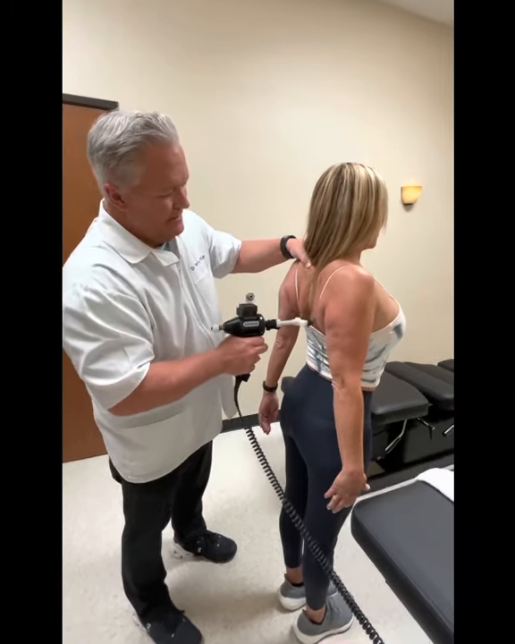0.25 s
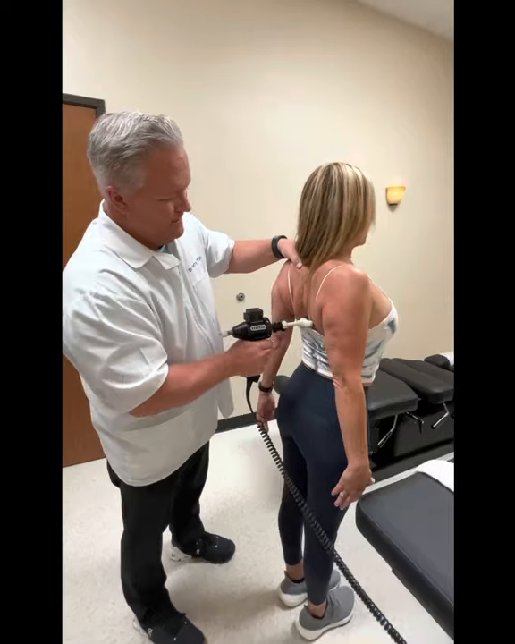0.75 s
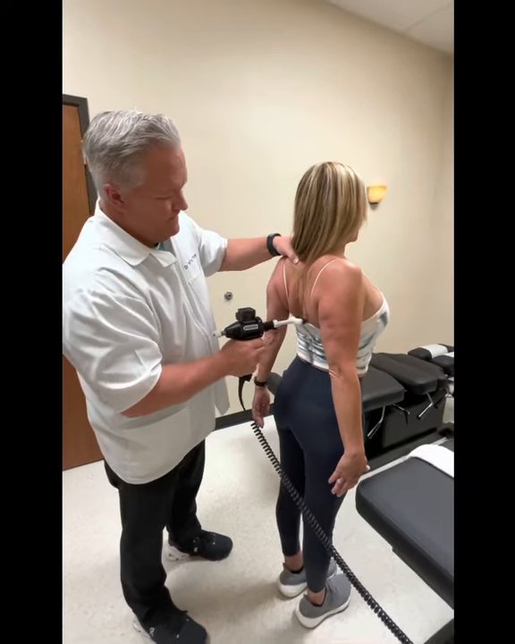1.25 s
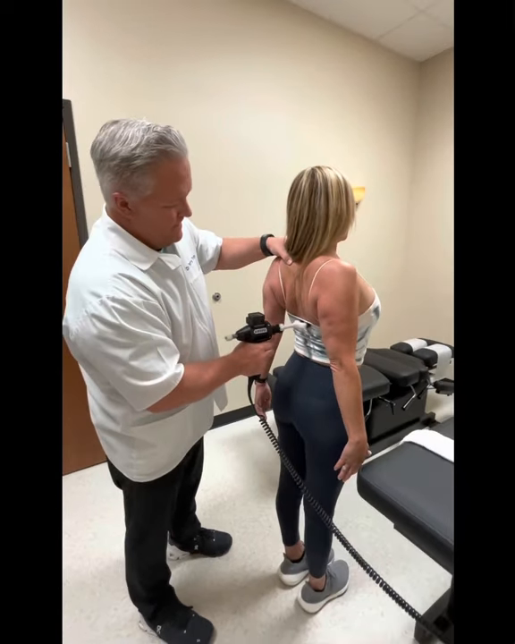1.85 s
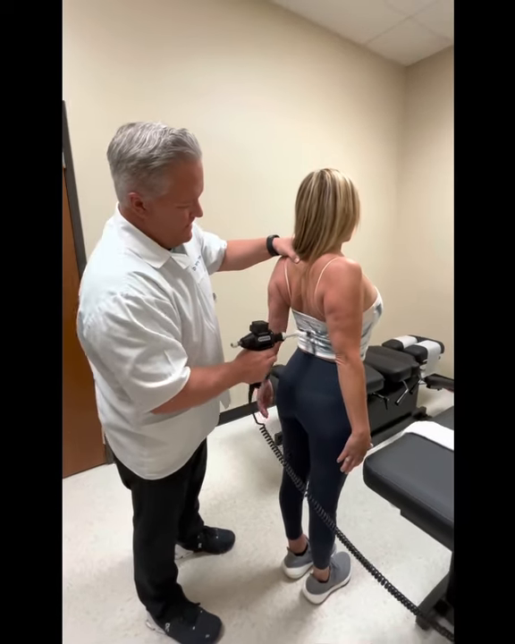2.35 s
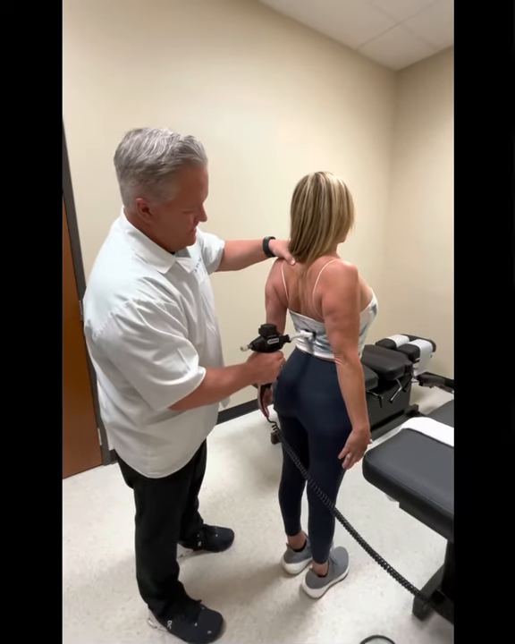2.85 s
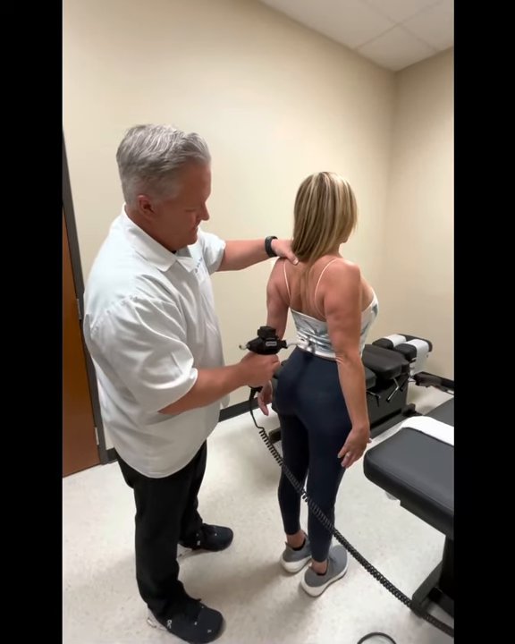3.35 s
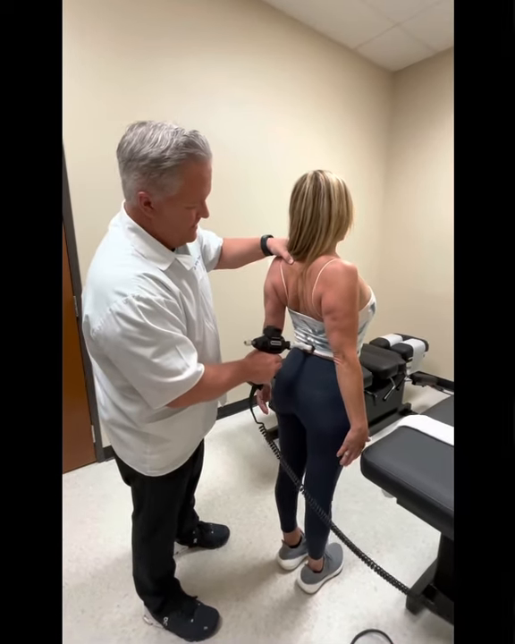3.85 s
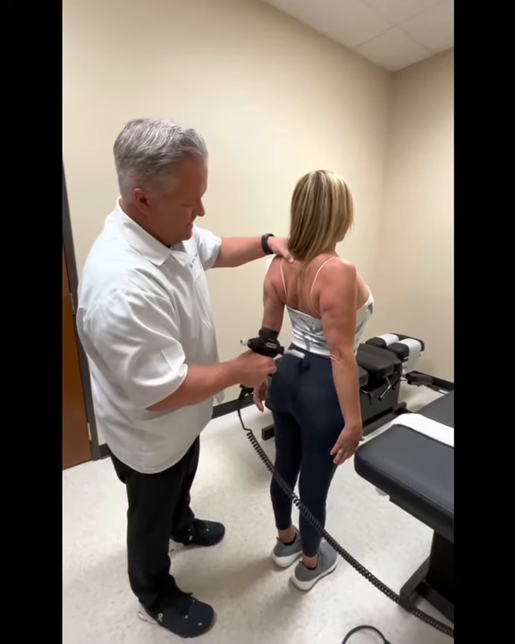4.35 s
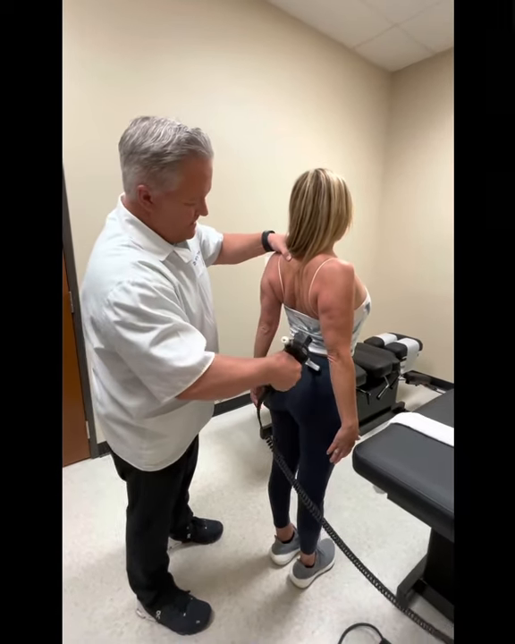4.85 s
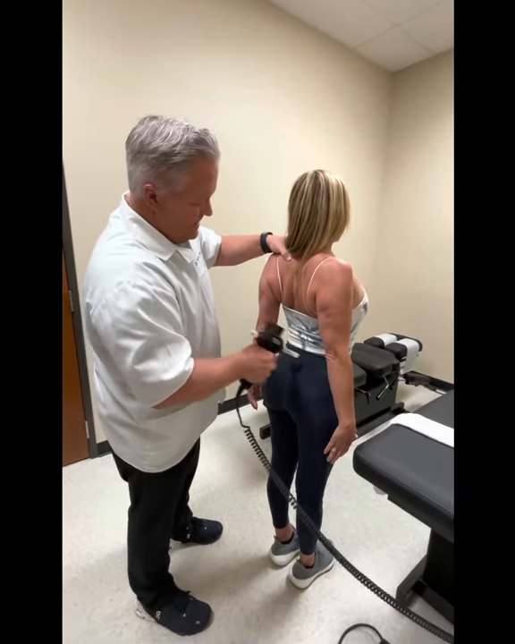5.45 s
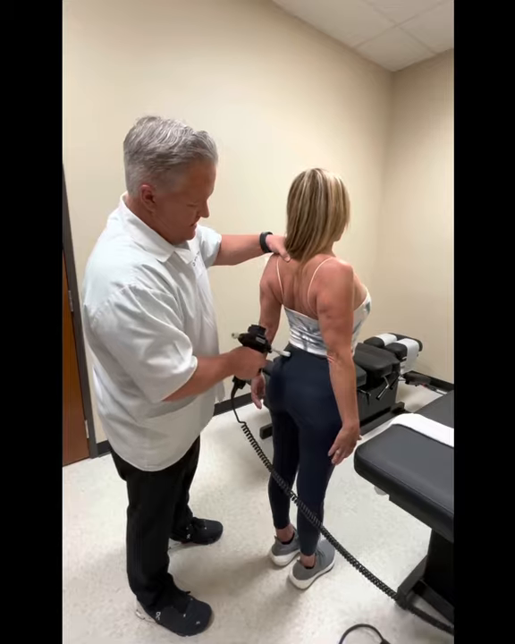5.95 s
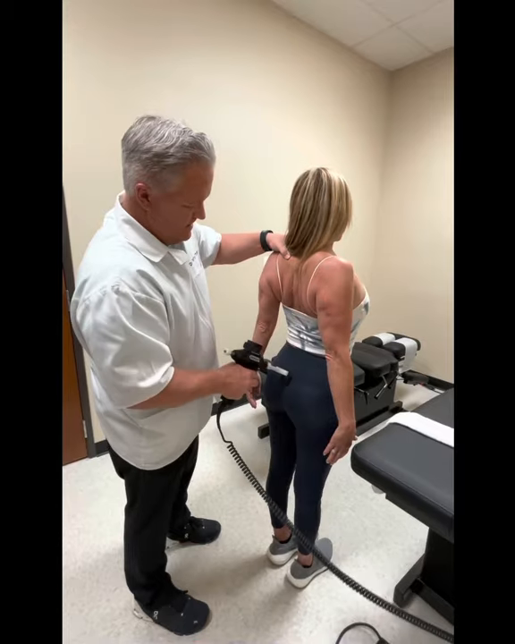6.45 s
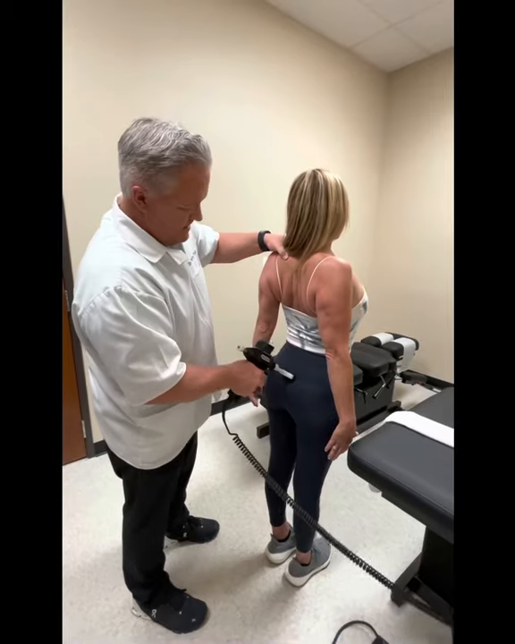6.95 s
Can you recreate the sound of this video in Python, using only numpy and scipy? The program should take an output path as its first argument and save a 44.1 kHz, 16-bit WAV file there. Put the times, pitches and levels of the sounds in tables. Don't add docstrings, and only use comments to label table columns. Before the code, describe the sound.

A solenoid adjusting tool rattles in fast, even machine-like bursts, heard near the microphone with short, tight room reflections. Early bursts carry more low thump from the chest; later ones, lower down the back, are thinner, harder and more clattery with looser chatter. Between them, soft finger and cloth rubs and thin ticks sit above a quiet ventilation hum.

```python
import sys
import numpy as np
from scipy import signal
from scipy.fft import rfft, irfft, next_fast_len
from scipy.io import wavfile
from scipy.ndimage import uniform_filter1d, minimum_filter1d, map_coordinates

SR = 44100
rng = np.random.default_rng(int(sys.argv[2]) if len(sys.argv) > 2 else 0)


def to_linear_factor(level_db):
    exponent = np.asarray(level_db, float) / 20
    return 10 ** exponent


def transcribe(u):
    v = np.clip(np.atleast_2d(u).T, -1, 1)
    q = np.round(v * 32767).astype(np.int16)
    wavfile.write(sys.argv[1], SR, q)


N = 317150


def rms_one(x):
    return x / np.sqrt(np.mean(x ** 2) + 1e-20)


def at_hz(points, hz):
    table_hz, value = np.transpose(points)
    return np.interp(np.log(hz), np.log(table_hz), value)


def drift(rate_hz):
    knots = rng.standard_normal(400)
    return map_coordinates(knots, [np.arange(N) / SR * rate_hz], order=1)


def coloured(x, gain_at):
    size = next_fast_len(N + SR // 4, True)
    return irfft(rfft(x, size) * gain_at(np.fft.rfftfreq(size, 1 / SR)), size)[..., :N]


def above(x, hz):
    return signal.sosfilt(signal.butter(4, hz, "high", fs=SR, output="sos"), x)


def strike(times, level_db, modes, uneven_db):
    out = np.zeros(N)
    luck = rng.standard_normal((len(times), len(modes)))
    at = np.round(times * SR).astype(int)
    for k, (hz, mode_db, t60) in enumerate(modes):
        clicks = np.full(N, 1e-18)
        polarity = (-1) ** (k + 1)
        clicks[at] = polarity * to_linear_factor(level_db + mode_db + uneven_db * luck[:, k])
        decay = to_linear_factor(-60 / (max(t60, .002) * SR))
        turn = 2 * np.pi * hz / SR
        out += signal.lfilter([0, np.sin(turn)], [1, -2 * decay * np.cos(turn), decay ** 2], clicks)
    return out


def puffs(times, level_db, t60, low_hz, high_hz, rise=0.0016, spread=0.57):
    lead = SR // 50
    shape = np.zeros(N + SR)
    t = np.arange(-lead, round(np.max(t60) * SR) + 100) / SR
    for s, peak, fall in np.broadcast(times, to_linear_factor(level_db), t60):
        at = round(s * SR)
        swell_and_fall = np.where(t > 0, t / max(fall, .002), -t / max(rise, 1e-4))
        shape[at:at + len(t)] += peak * to_linear_factor(-60 * swell_and_fall)
    band = signal.butter(2, [low_hz, high_hz], "band", fs=SR, output="sos")
    mid, side = signal.sosfilt(band, shape[lead:][:N] * rng.standard_normal((2, N)))
    return mid + spread * side * [[1], [-1]]


def bands(size, likeness):
    edges = 30 * 2 ** np.arange(0, 9.6, .5)
    white = rng.standard_normal((2, 2, size))
    for k, (low, high) in enumerate(zip(edges, edges[1:])):
        band = signal.butter(2, [low, high], "band", fs=SR, output="sos")
        mid, side = signal.sosfilt(band, white[k % 2])
        hz = np.sqrt(low * high)
        alike = np.clip(at_hz(likeness, hz), -1, 1)
        mid, side = np.sqrt(1 + alike) * mid, np.sqrt(1 - alike) * side
        yield hz, np.array([mid + side, mid - side])


# pitch_hz, level_db (per Hz)
AIR_SPECTRUM = [(30, -11), (80, -11.5), (123, 3), (193, -27), (283, -15.5), (490, -39), (668, -19.5),
                (808, -31), (910, -16.5), (1180, -32), (2100, -34), (3000, -37), (9000, -45),
                (11700, -94.5), (19800, -120)]
# pitch_hz, likeness (-1 to 1)
AIR_LIKENESS = [(40, -.8), (120, -.6), (240, -.4), (950, -.5), (3800, -.5), (15000, -.7)]
# time_s, level_db
AIR_LEVEL = [(0.3, -60), (1.399, -62), (2.402, -59), (3.448, -64), (4.448, -61), (5.5, -56.5), (6.448, -64),
             (7.19, -53)]


def air():
    t = np.arange(N) / SR
    rumble = sum(to_linear_factor(at_hz(AIR_SPECTRUM, hz) + 2.5 * drift(11)) * noise
                 for hz, noise in bands(N, AIR_LIKENESS))
    hum = to_linear_factor(1.5 + 2.1 * drift(11)) * np.sin(2 * np.pi * 121 * t + 4.0 * drift(6.1))
    level_db = np.interp(t, *np.transpose(AIR_LEVEL))
    return to_linear_factor(level_db) * (rms_one(rumble) + hum * [[1], [-.25]])


def earlier_blows():
    return puffs(np.zeros(1), -36.5, 0.54, 100, 7000)


# pitch_hz, level_db, t60_s
TIP = [(2030, 2.5, 0.0055), (3180, -5, 0.015), (3930, -4.5, 0.0075), (6050, -7.5, .005), (8600, 2.5, .0025),
       (10900, -4, 0.0013), (15000, -9, .003)]


def plunger_crack(blow, crack_db):
    slide = puffs(blow, crack_db - 17, 0.0045, 630, 9700, rise=0.038)
    slam = puffs(blow + 0.00032, crack_db + 3, 0.027, 730, 14000, rise=0.0038)
    first_stroke = strike(blow + .0004, crack_db - 3.0, TIP, uneven_db=1.5)
    second_stroke = strike(blow + .0026, crack_db - 4.0, TIP, uneven_db=2.0)
    return slide + slam + first_stroke + second_stroke


# pitch_hz, level_db, t60_s
SHELL = [(766, 5, .1), (880, -8, .04), (812, 4, .09)]
# pitch_hz, level_db, t60_s
CAP = [(973, -13, 0.25), (1077, 3.5, 0.01), (1213, -0.5, 0.041), (1470, -4, 0.021), (1653, -2, 0.016)]


def housing_ring(blow, back, shell_db, cap_db):
    pull = strike(blow - .010, shell_db - 22, SHELL, uneven_db=1.5)
    shell = strike(blow + .001, shell_db, SHELL, uneven_db=.6)
    cap = strike(blow + .001, cap_db, CAP, uneven_db=.8)
    shaken = strike(back, shell_db - 9, SHELL + CAP, uneven_db=2.0)
    return above(pull + shell + cap + shaken, 550)


# pitch_hz, level_db, t60_s
CHEST = [(64.3, 4.5, 0.28), (74, 2.5, 0.15), (120.2, 5.5, 0.15)]
# pitch_hz, level_db, t60_s
FLESH = [(169, -8.5, 0.0055), (227, -2.5, 0.018), (262.7, 10.5, 0.014), (404, -4.5, 0.052)]
# pitch_hz, level_db, t60_s
HANDLE = [(244, 2, .07), (1048, 4, .06), (1940, -3, .03), (2110, -6, .02)]


def body_thump(blow, chest_db, flesh_db, handle_db):
    handle = strike(blow + .002, handle_db, HANDLE, uneven_db=1.2)
    flesh = strike(blow + 0.003626, flesh_db, FLESH, uneven_db=.5)
    chest = strike(blow + .006, chest_db, CHEST, uneven_db=.5)
    wall_echo = strike(blow + 0.0281, chest_db - 3, CHEST + FLESH, uneven_db=.6)
    return above(chest + wall_echo, 52) + above(flesh + handle, 130)


def loose_parts(blow, back_lag, loose_db):
    lags_s = np.array([.0035, .007, .011, .03, .045])
    luck = rng.standard_normal((len(blow), 5, 2))
    chatter = (blow[:, None] + lags_s * (1 + 0.11 * luck[..., 0])).ravel()
    chatter_db = (loose_db[:, None] - 150 * lags_s + 4.5 * luck[..., 1]).ravel()
    chance = rng.standard_normal((2, len(blow)))
    knock = blow + .65 * back_lag + .0012 * chance[0]
    knock_db = loose_db + 1.5 - 7.0 * np.abs(chance[1])
    knock_modes = [(3200, 0.0, 0.0063), (2700, -13, 0.0017)]   # pitch_hz, level_db, t60_s
    return (puffs(chatter, chatter_db, 0.0097, 910, 9000)
            + strike(knock - .0003, knock_db, knock_modes, uneven_db=1.5))


# pitch_hz, level_db, t60_s
STOP = [(5795, -6.5, 0.015), (6165, -6, 0.017), (6500, -17, 0.0045), (8160, 2, 0.0059),
        (10800, 11.5, 0.0019), (14480, 5.5, 0.0035)]


def rebound_click(back, back_db):
    ring = strike(back - .0003, back_db - 3, STOP, uneven_db=2.0)
    return ring + puffs(back - .0003, back_db + 2.0, 0.01, 5400, 10000)


def coil_slack(first_blow):
    return puffs(first_blow - 0.0095, -25.5 - 18, 0.0095, 3000, 9500)


# start_s, crack_db, rebound_lag_s, rebound_db, looseness_db
BURSTS = [
    (0.016, -27, 0.02, -18.5, -48.5),
    (.6012, -26.5, .0213, -24, -48.5),
    (1.601, -26.5, 0.021, -23.5, -34.5),
    (2.601, -26.5, 0.024, -24, -34.5),
    (3.601, -27, 0.022, -23, -36.5),
    (4.6829, -23.5, .0232, -17, -29.5),
    (5.6842, -25.5, 0.019, -21.5, -28),
    (6.5994, -25, 0.026, -18.5, -35.5),
]
BLOW_COUNTS = [1, 7, 7, 7, 7, 7, 6, 6]
# chest_db, flesh_db, shell_db, cap_db, handle_db
PLACES = [(-35, -27, -29.5, -22.5, -33.5), (-36, -30, -32, -26, -40), (-37.5, -31.5, -31, -27.5, -49),
          (-43.5, -31.5, -31.5, -27, -40.5), (-50.5, -31.5, -33, -25.5, -37),
          (-51, -33.5, -32.5, -25.5, -37), (-57.5, -30, -29, -25.5, -34), (-58.5, -32.5, -35, -27.5, -28)]


def tapper():
    first, crack_db, back_lag, back_db, loose_db = np.repeat(BURSTS, BLOW_COUNTS, axis=0).T
    chest_db, flesh_db, shell_db, cap_db, handle_db = np.repeat(PLACES, BLOW_COUNTS, axis=0).T
    done = np.concatenate([np.arange(count) for count in BLOW_COUNTS])
    to_come = np.concatenate([np.arange(count)[::-1] for count in BLOW_COUNTS])
    last = to_come == 0
    blow = first + done / 12
    crack_db = crack_db + 0.18 * (done - to_come) / 2
    chest_db = chest_db - 8.5 * last
    shell_db = shell_db + 1 * last
    back_lag = back_lag - .005 * last
    chance = rng.standard_normal((2, len(blow)))
    back = blow + back_lag + .001 * chance[0]
    back_db = back_db - 0.5 * last + 2.0 * chance[1]
    ring = housing_ring(blow, back, shell_db, cap_db) + body_thump(blow, chest_db, flesh_db, handle_db)
    snap = plunger_crack(blow, crack_db) + loose_parts(blow, back_lag, loose_db)
    snap += rebound_click(back, back_db)
    snap += coil_slack(blow[done == 0][1:])
    return ring, snap


# pitch_hz, t60_s
ROOM_T60 = [(50, 0.17), (130, 0.55), (350, 0.49), (920, 0.36), (2430, 0.38), (6400, 0.35), (13000, 0.26)]
# pitch_hz, level_db
ROOM_COLOUR = [(60, -7.5), (150, -6.5), (260, -6.5), (420, 5), (800, -2.5), (1500, -0.5), (4500, -4.5),
               (9000, -6), (15000, -7)]
# pitch_hz, likeness (-1 to 1)
ROOM_LIKENESS = [(60, .4), (300, .8), (900, .9), (2000, .2), (3200, .6), (4800, .15), (6500, .5),
                 (8500, .88), (10000, 1), (13000, 1), (16000, .6)]


def room(x):
    t = np.arange(30000) / SR
    echoes = sum(to_linear_factor(at_hz(ROOM_COLOUR, hz) - 60 * t / at_hz(ROOM_T60, hz)) * noise
                 for hz, noise in bands(len(t), ROOM_LIKENESS))
    first_walls = np.clip((t - .002) / 0.00083, 0, 1)
    return signal.fftconvolve(x[None], echoes * first_walls * to_linear_factor(-30), axes=1)[:, :N]


# start_s, peak_db, ring_out_s
GRIP = [
    (0.4731, -52, 0.075),
    (1.4832, -51, 0.2),
    (2.546, -58, 0.2),
    (3.4982, -49.5, 0.096),
    (5.609, -75, 0.081),
    (5.6526, -51.5, 0.042),
    (6.4208, -48.5, 0.049),
]
# start_s, peak_db, ring_out_s
TRIGGER = [
    (.503, -54.5, 0.14),
    (4.634, -54, 0.098),
    (6.571, -60, 0.052),
]


def grip():
    rub, rub_db, rub_fall = np.transpose(GRIP)
    tick, tick_db, tick_fall = np.transpose(TRIGGER)
    return puffs(rub, rub_db - 6.5, rub_fall, 800, 6500) + puffs(tick, tick_db - 3.5, tick_fall, 4500, 9000)


# pitch_hz, level_db
LEFT_OVER = [(60, -1.0), (92, 1.0), (140, 7.0), (210, 10.5), (330, 5.5), (500, 1.5), (770, 2.5),
             (1170, 1.5), (2380, 3.5), (4400, 2.0), (6400, 0.0), (15000, 0.0)]
# pitch_hz, lead_radians
LEFT_LEAD = [(0, 1.2), (120, 1.5), (260, 2.8), (690, 3.8), (1290, 3.7), (2200, 5.4), (3300, 4.7),
             (4600, 5.2), (6200, .7), (8300, 2.9), (13000, 3.2), (15000, 4.1), (16700, 3.2)]


def ports(x):
    def sides(hz):
        lean = to_linear_factor(at_hz(LEFT_OVER, hz + 1) / 2)
        lag = np.exp(-1j * np.interp(hz, *np.transpose(LEFT_LEAD)))
        return [lean, lag / lean]
    return coloured(x, sides)


def scene():
    ring, snap = tapper()
    snap = snap + grip()
    near = ring + snap + earlier_blows()
    return ports(near + room(to_linear_factor(-4.5) * ring + snap.mean(0))) + air()


# pitch_hz, level_db
MICROPHONE = [(20, -8.5), (50, 6), (8500, -1.5), (12500, -15.5), (14500, -7), (15800, -2.5), (16500, -24.5)]


def microphone(x):
    return coloured(x, lambda hz: to_linear_factor(at_hz(MICROPHONE, hz + 1)) * (hz < 16800))


def limiter(x):
    limit_db, recovery_db_per_s = -13, 400
    over = np.maximum(20 * np.log10(np.abs(x).max(0) + 1e-9) - limit_db, 0)
    slope = recovery_db_per_s * np.arange(N) / SR
    held = np.maximum.accumulate(over + slope) - slope
    ahead = uniform_filter1d(-minimum_filter1d(-held, size=89), size=45)
    return x * to_linear_factor(-.7 * ahead)


# from_hz, to_hz, least_db
SPARED = [(8300, 9600, -63), (9600, 13800, -54), (13800, 17000, -61)]


def drop_faint_treble(x):
    for low, high, least_db in SPARED:
        corners = [low, low + 300, high, high + 300]
        treble = coloured(x.mean(0), lambda hz: np.interp(hz, corners, [0, 1, 1, 0]))
        faint = uniform_filter1d(treble ** 2, size=256) < to_linear_factor(2 * (least_db + 5 * drift(30)))
        x = x - treble * uniform_filter1d(1. * faint, size=128)
    return x


def band_limit(x):
    return signal.sosfilt(signal.butter(12, 17160, fs=SR, output="sos"), x)


def record(dry):
    mix = drop_faint_treble(limiter(microphone(dry)))
    return band_limit(mix)


dry = scene()
out = record(dry)
transcribe(out)
```